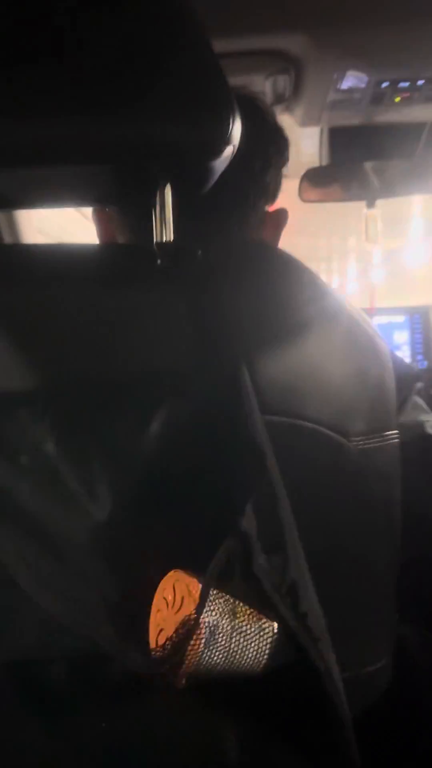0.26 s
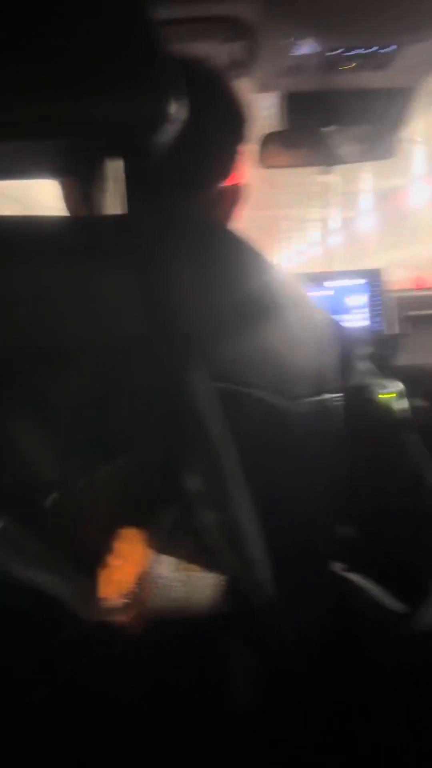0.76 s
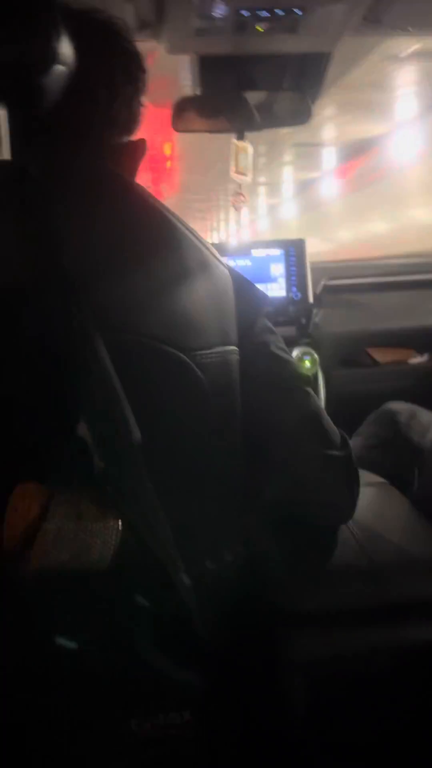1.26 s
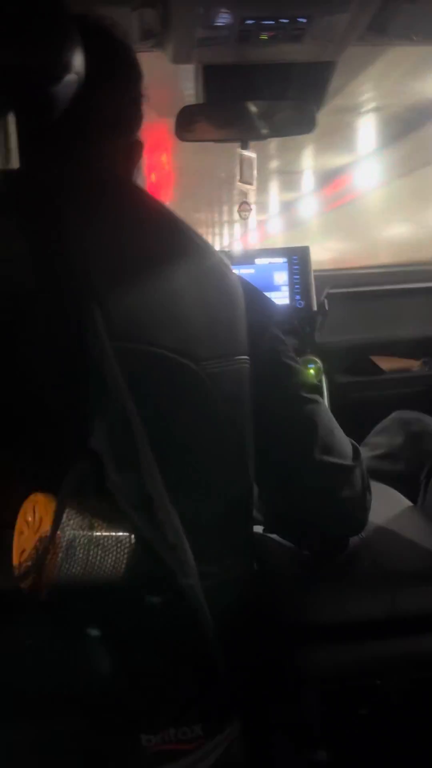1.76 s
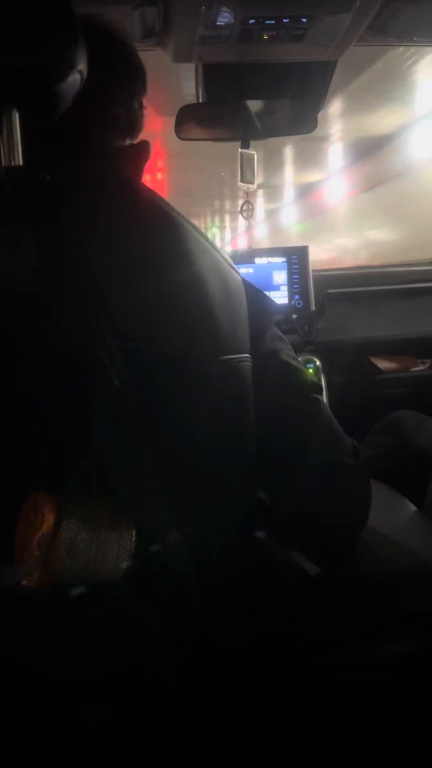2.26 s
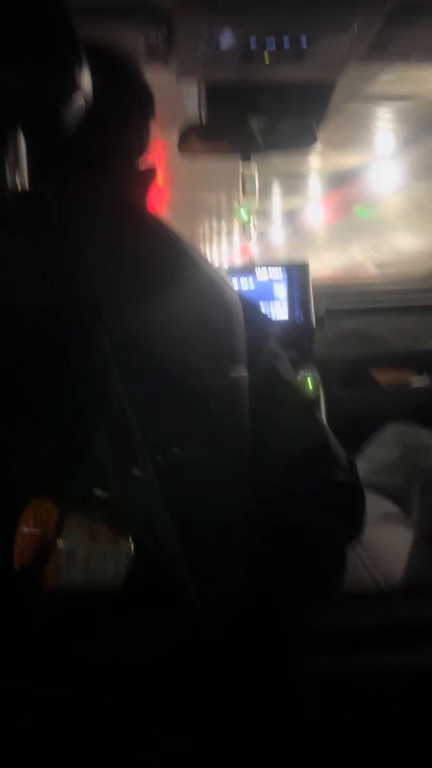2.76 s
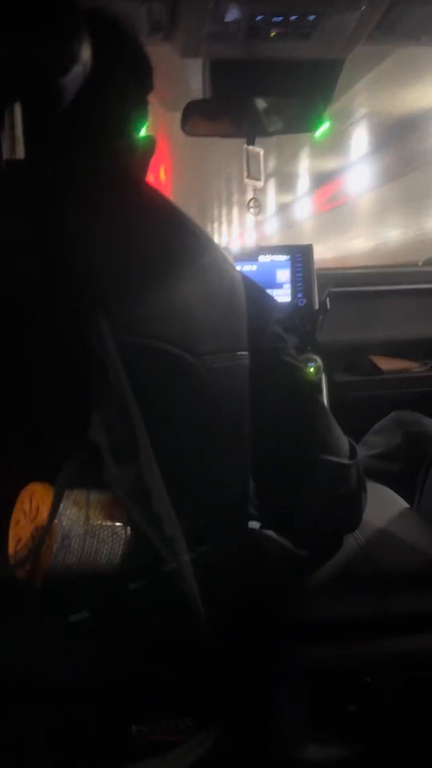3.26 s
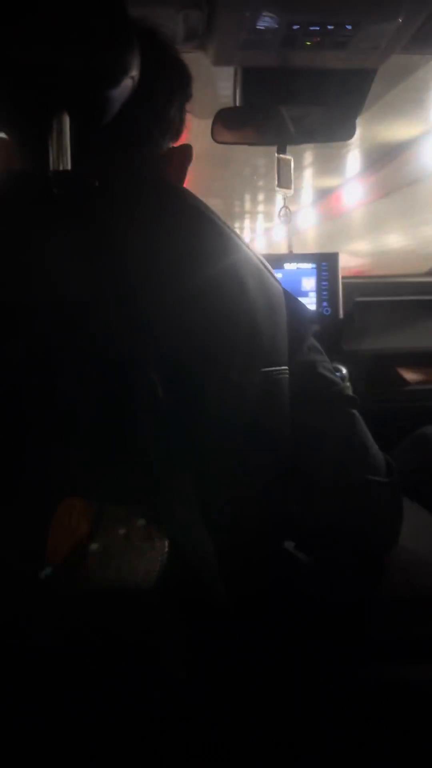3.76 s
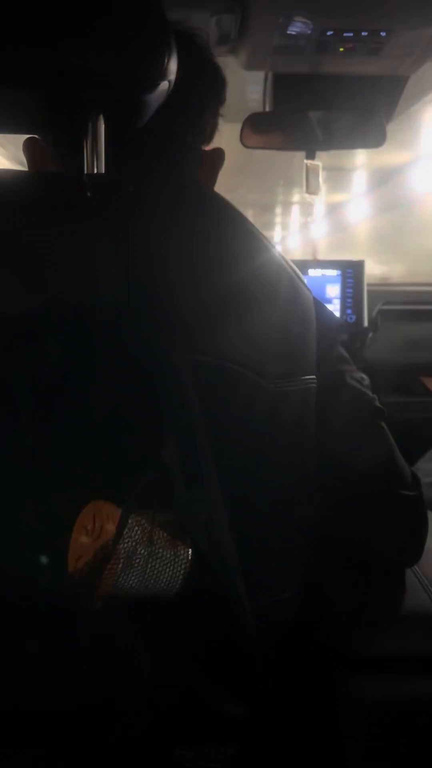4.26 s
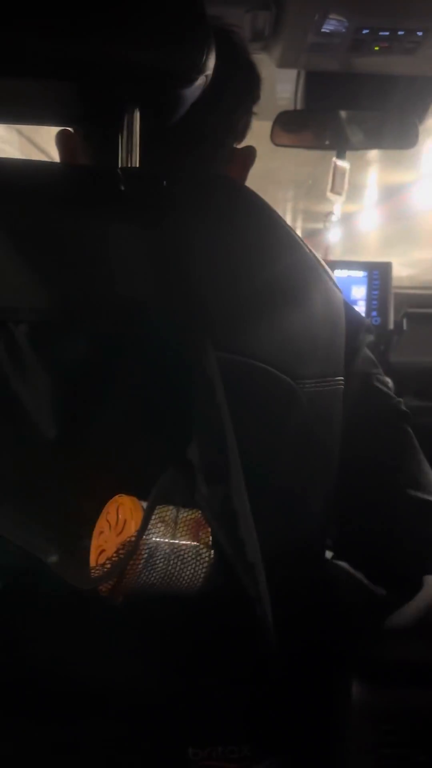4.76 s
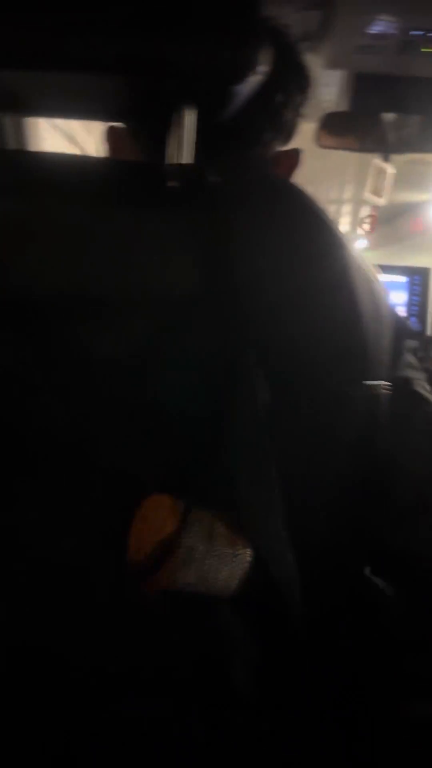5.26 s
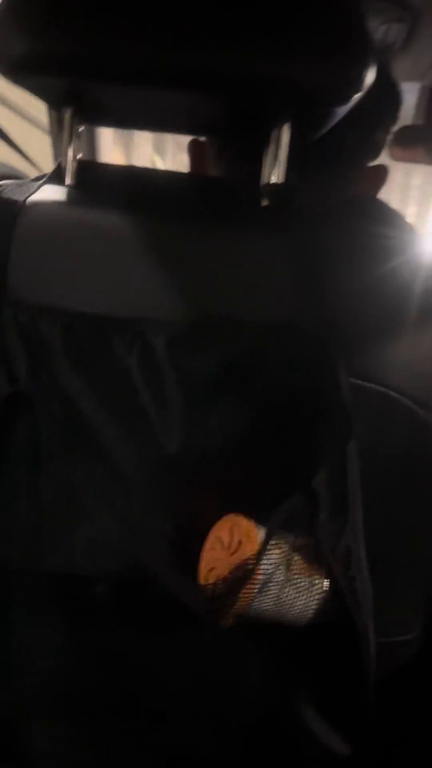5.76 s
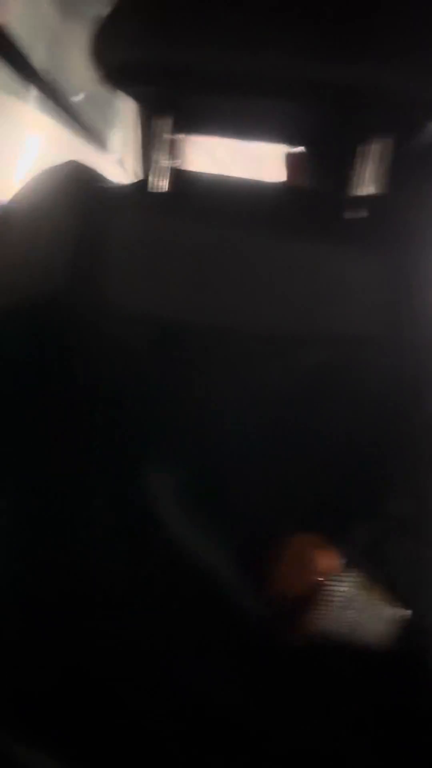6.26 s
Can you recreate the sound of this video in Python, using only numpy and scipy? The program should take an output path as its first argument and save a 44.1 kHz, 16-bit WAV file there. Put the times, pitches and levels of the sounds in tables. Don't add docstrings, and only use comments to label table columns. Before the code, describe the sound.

Continuous bass-heavy car interior sound, recorded by a handheld stereo device in the rear seat. Road bumps make the low boom pulse unevenly while tyre roar reflects dully off tunnel walls. Early on there is a neighbouring vehicle's low tone, then a light cloth rustle and a tiny plastic click. Low hums waver, a seal whistles almost inaudibly, and later the engine pushes harder, rising in pitch until the abrupt end.

```python
import sys
import numpy as np
from scipy import signal
from scipy.fft import rfft, irfft, next_fast_len
from scipy.io import wavfile

SR = 44100
rng = np.random.default_rng(int(sys.argv[2]) if len(sys.argv) > 2 else 0)


def decibels_to_gain(level_db):
    exponent = np.asarray(level_db, float) / 20
    return 10 ** exponent


def pcm_store(signal):
    levels = np.round(np.clip(np.atleast_2d(signal), -1, 1) * 32767)
    wavfile.write(sys.argv[1], SR, levels.astype(np.int16).T)


N = 287091
OPPOSITE = np.array([[1], [-1]])


def rms_one(x):
    return x / np.sqrt(np.mean(x ** 2) + 1e-20)


def in_time(rows):
    s, *columns = np.transpose(rows)
    return [np.interp(np.arange(N) / SR, s, c) for c in columns]


def per_sample(control):
    return np.interp(np.arange(N) / SR * 1000, np.arange(len(control)), control)


def coloured(spectrum):
    size = next_fast_len(N)
    hz, level = np.transpose(spectrum)
    log_hz = np.log(np.arange(size // 2 + 1) * SR / size + 1e-3)
    gain = decibels_to_gain(np.interp(log_hz, np.log(hz), level, left=-120, right=-120))
    white = rng.standard_normal(size)
    return rms_one(irfft(rfft(white) * gain, size)[:N])


def drift(rate):
    r = np.exp(-80 * np.pi * rate / SR)
    sparse = rng.standard_normal(N // 40 + 2002)
    slow = signal.lfilter([1], [1, -2 * r, r * r], sparse)[2000:]
    return np.interp(np.arange(N) / 40, np.arange(len(slow)), rms_one(slow))


def swell(start, hold, rise, fall):
    t = np.arange(0, N / SR, .001) - start
    ramp = np.minimum(t / rise + 1, (hold - t) / fall + 1)
    return np.sin(np.pi / 2 * np.clip(ramp, 0, 1)) ** 2


def swells(rows, rise, fall):
    gains = [decibels_to_gain(db) * swell(s, hold, rise, fall) for s, hold, db in rows]
    return per_sample(np.max(gains, axis=0))


def clicks(events):
    out = np.full(N, 1e-18)
    out[[round(s * SR) for s, db in events]] = decibels_to_gain(np.array(events)[:, 1])
    return out


def dying(impulses, t60):
    return signal.lfilter([1], [1, -decibels_to_gain(-60 / (t60 * SR))], impulses)


def hum(pitch, level, wobble_hz, multiple=1):
    hz = multiple * in_time(pitch)[0] + wobble_hz * drift(0.78)
    phase = 2 * np.pi * np.cumsum(hz) / SR + rng.uniform(0, 2 * np.pi)
    flutter_db = 1.2 * drift(5.1)
    load = swells(level, rise=0.076, fall=0.14)
    return np.sqrt(2) * decibels_to_gain(flutter_db) * load * np.sin(phase)


def road():
    # frequency in Hz, level in dB per Hz
    shake = [(16, -22), (25, -15), (32, -10), (38, -4), (48, 1.5), (58, -0.5), (68, -12.5), (90, -39.5)]
    # frequency in Hz, level in dB per Hz
    boom = [(45, -33), (60, -5.5), (78, 2), (95, -2), (112, -2.5), (124, -9), (134, -6), (148, -11),
            (165, -19.5), (200, -45.5)]
    # frequency in Hz, level in dB per Hz
    roar = [(110, -21), (150, 2), (165, -4), (183, 0.5), (200, -2.5), (310, -6), (400, -5), (490, -9),
            (560, -8), (640, -12), (950, -15), (1400, -22), (2300, -30.5), (3000, -42)]
    # frequency in Hz, level in dB per Hz
    hiss = [(1800, -25), (2600, 0.5), (3100, 1.5), (3500, 2.5), (4300, 0), (5200, 2.5), (5800, 0.5),
            (7200, -6), (8000, -14.5), (8500, -30), (9100, -30), (9600, -17), (10000, -39.5), (13500, -47),
            (14900, -35), (15500, -44)]
    # time in seconds, lift of shake in dB, lift of boom in dB
    surface = [(.06, -1, 5.5), (.17, -3, 1), (.33, 2, -11), (0.471, 10, -3), (.85, -2, -1.5),
               (.94, 3.5, -19), (1.298, 3, 1), (1.48, 9, 2), (1.56, -4, -9), (2.22, 1, 4.5), (2.55, 10, 3),
               (2.81, -3, -0.5), (2.9, 13, 0), (3.1, 1, 2), (3.36, 6, -10), (3.52, 10.5, -4),
               (3.68, -6, -3.5), (3.8, -3, 3), (3.95, 1, -4), (4.1, -1, 1), (4.22, -7, -5.5),
               (4.32, 12.5, -6), (4.671, 1, 11.5), (5.11, 0, -3.5), (5.22, 0, 3.5), (5.35, 8.5, 0),
               (5.5, -1, -5), (5.62, 6, 0.5), (5.76, -4, 2), (5.95, 3, 1), (6.08, -12, -2), (6.21, 4, 5),
               (6.431, -9, 4)]
    shake_db, boom_db, roar_db, hiss_db = -32, -25.5, -32, -57
    jolts = np.array([swell(s, 0, rise=0.024, fall=0.077) for s, *lifts in surface])
    shake_lift, boom_lift = [per_sample(lift) for lift in np.array(surface)[:, 1:].T @ jolts]
    pull_db = 0.18 * (np.arange(N) - N / 2) / SR
    body = decibels_to_gain(shake_db + shake_lift + pull_db) * coloured(shake)
    cabin = decibels_to_gain(boom_db + boom_lift + pull_db) * coloured(boom)
    walls = decibels_to_gain(roar_db + 0.36 * pull_db + 0.49 * drift(3.9)) * coloured(roar)
    seals = decibels_to_gain(hiss_db + 0.3 * pull_db + 0.56 * drift(6.4)) * coloured(hiss)
    return body + cabin + walls + seals


def port_lead(x):
    # frequency in Hz, quarter-cycle share (no unit, + = left leads)
    lead = [(500, 0), (1000, .13), (1500, .08), (2300, .03), (3000, .12), (3600, .03), (4600, .14),
            (5150, 0), (5600, -.15), (6500, -.46), (7300, -.7), (7900, -.83), (8600, -.5), (9500, 0)]
    size = next_fast_len(N)
    hz, share = np.transpose(lead)
    turn = 1j * np.interp(np.arange(size // 2 + 1) * SR / size, hz, share)
    return irfft(turn * rfft(x, size), size)[:N]


def diffuse():
    # frequency in Hz, level in dB per Hz
    scattered = [(30, -37), (60, -27.5), (100, -13.5), (160, -6.5), (310, -8.5), (380, -7), (500, -3),
                 (650, 0.5), (950, -2.5), (1400, -15.5), (1800, -29), (2200, -30), (2600, -23.5),
                 (3000, -24.5), (3500, -31), (4500, -31.5), (5200, -34), (5800, -37.5), (6500, -38),
                 (7300, -38), (8000, -43), (8800, -49.5)]
    # frequency in Hz, level in dB per Hz
    port_noise = [(7000, -8.5), (9000, 2.5), (11000, -1), (12500, -8), (14000, -11.5), (15000, -2),
                  (15500, -19)]
    # frequency in Hz, level in dB per Hz
    sway = [(25, -15.5), (50, -10), (90, -2.5), (130, -1.5), (170, -14)]
    steady = decibels_to_gain(-42.5) * coloured(scattered) + decibels_to_gain(-85.5) * coloured(port_noise)
    return steady + decibels_to_gain(-62.5 + 4 * drift(3)) * coloured(sway)


def footwell():
    # frequency in Hz, level in dB per Hz
    mode = [(200, -29.5), (260, -6), (315, 5), (350, -15), (420, -36)]
    # time in seconds, level in dB
    drive = [(0, -5), (1.2, -2), (2.2, 3), (3.4, 3), (4.2, 2.5), (5.2, 2), (6.51, 0)]
    drive_db = -45.5 + 0.3 * drift(.8) + in_time(drive)[0]
    return decibels_to_gain(drive_db) * coloured(mode) * decibels_to_gain(np.array([[-4], [3]]))


def tyre_hum():
    # start in seconds, hold in seconds, level in dB
    tread = [(0.0, 1.2, -34.5), (1.36, 0.12, -27), (1.6, 0.02, -31), (1.8, 0.53, -27), (2.42, 0.013, -27),
             (2.58, .02, -29), (2.7, 0.024, -25), (3.0, 0.046, -25.5), (3.2, 0.085, -25.5),
             (3.6, 0.71, -36), (4.68, 0.046, -31), (5.3, 0.42, -30.5), (5.95, 0.11, -26),
             (6.2, 0.27, -26.5)]
    # time in seconds, frequency in Hz
    pitch = [(0, 110), (2.8, 109.5), (3.2, 115), (3.7, 121), (5.2, 118.5), (6.51, 116)]
    return hum(pitch, tread, 0.27)


def neighbour():
    # start in seconds, hold in seconds, level in dB
    fading = [
        (0.0, 0.029, -27),
        (.2, 0.069, -31.5),
        (.46, 0.033, -24.5),
        (3.35, 0.23, -32.5),
        (4.02, 0.17, -34.5),
    ]
    # time in seconds, frequency in Hz
    pitch = [(0, 96), (.6, 96), (3.2, 126), (3.65, 137), (3.9, 96), (4.2, 102)]
    return hum(pitch, fading, 0.12)


def driveline():
    # start in seconds, hold in seconds, level in dB
    shaft = [
        (0.15, 0.18, -30),
        (.6, 0.39, -30.5),
        (1.1, 1.32, -30.5),
        (3.0, 0.24, -28),
    ]
    # time in seconds, frequency in Hz
    shaft_hz = [(0, 44), (3.3, 44.5)]
    # start in seconds, hold in seconds, level in dB
    axle = [(1.2, 0.55, -35), (2.42, 0.06, -34), (2.65, 0.19, -28.5), (3.12, 0.084, -25.5),
            (3.502, 1.1, -33), (5.22, 0.23, -27.5), (5.55, 0.2, -29), (5.9, 0.09, -22.5),
            (6.15, 0.1, -25.5), (6.4, .08, -26)]
    # time in seconds, frequency in Hz
    axle_hz = [(0, 51), (6.51, 50)]
    return hum(shaft_hz, shaft, 0.18) + hum(axle_hz, axle, 0.14)


def floor_panel():
    # start in seconds, hold in seconds, level in dB
    panel = [
        (0.448, 0.24, -29),
        (1.5, .04, -27.5),
        (5.78, 0.14, -27),
        (6.015, 0.076, -25),
    ]
    # time in seconds, frequency in Hz
    pitch = [(0, 60), (.8, 60), (1.4, 72), (1.6, 72), (5.7, 79), (6.1, 84)]
    return hum(pitch, panel, 0.26)


def sleeve():
    # start in seconds, hold in seconds, level in dB
    strokes = [
        (.818, .003, -64),
        (.86, 0.008, -65.5),
        (.92, 0.0085, -63),
        (.95, .025, -56),
        (.99, 0.031, -56),
        (1.038, 0.019, -55),
        (1.156, 0.0033, -65.5),
        (1.2, 0.011, -61.5),
    ]
    # frequency in Hz, level in dB per Hz
    cloth = [(2500, -7), (4300, -2.5), (5400, 1.5), (7500, -3.5), (9000, -14.5), (10000, -18), (11000, -36),
             (14000, -38.5), (15000, -22), (15600, -34)]
    # frequency in Hz, level in dB per Hz
    brush = [(3000, -17), (5000, -2.5), (7500, -0.5), (10500, -7), (12500, -15), (15000, -15.5),
             (15600, -27)]
    # time in seconds, peak level in dB
    catches = [(.6035, -57), (.8177, -63), (.8362, -49), (.9125, -63), (.9415, -49), (1.0402, -64),
               (1.156, -68), (3.3, -68), (5.1, -64)]
    grain = decibels_to_gain(1.5 * drift(90))
    stroke = grain * swells(strokes, rise=.025, fall=0.054)
    fibres = coloured(cloth) + decibels_to_gain(-7.0) * coloured(brush) * OPPOSITE
    band = signal.butter(2, [7500, 15000], "band", fs=SR, output="sos")
    bright = signal.sosfilt(band, rng.standard_normal(N))
    snags = dying(clicks(catches), .005) * bright
    return stroke * fibres + snags * [[1], [.25]]


def engine():
    # start in seconds, hold in seconds, level in dB
    cruising = [(0.641, 0.049, -19), (1.03, 0.2, -25.5), (1.45, 0.043, -22), (1.7, 0.026, -31),
                (1.9, 0.13, -26.5), (2.13, 0.14, -25.5), (2.42, 0.014, -27), (2.53, 0.035, -27.5),
                (2.78, 0.032, -35), (2.9, 0.058, -25.5)]
    # time in seconds, frequency in Hz
    cruising_hz = [(.55, 87), (.8, 86), (1.0, 78.5), (2.2, 78.5), (3.1, 82.5)]
    # start in seconds, hold in seconds, level in dB
    revving = [(3.637, 0.3, -21.5), (4.115, 0.042, -25), (4.28, 0.066, -24.5), (4.537, 0.044, -23.5),
               (4.664, 0.074, -22.5), (4.84, 0.12, -21.5), (5.066, 0.026, -28.5), (5.225, 0.083, -22.5),
               (5.474, 0.12, -20), (6.002, 0.073, -27.5), (6.376, 0.058, -20.5)]
    # time in seconds, frequency in Hz
    revving_hz = [(3.5, 71), (3.74, 72), (4.3, 72), (4.45, 74), (4.7, 80), (4.97, 88), (5.08, 84),
                  (5.15, 76), (5.2, 98), (5.33, 96), (5.5, 100), (5.7, 100), (5.9, 96), (6.2, 95),
                  (6.51, 98)]
    # start in seconds, hold in seconds, level in dB
    half_order = [
        (3.45, 0.3, -35),
        (3.9, .45, -34.5),
        (4.6, .3, -39),
    ]
    # start in seconds, hold in seconds, level in dB
    second_order = [
        (4.36, 0.23, -36.5),
        (5.8, 0.1, -42),
    ]
    firing = hum(cruising_hz, cruising, 0.33) + hum(revving_hz, revving, 0.29)
    half = hum(revving_hz, half_order, 0.35, multiple=1 / 2)
    return firing + half + hum(revving_hz, second_order, 0.29, multiple=2)


def vent():
    # start in seconds, hold in seconds, level in dB
    whistles = [
        (2.95, .3, -68),
        (1.65, .2, -68),
        (5.8, .3, -71),
    ]
    # frequency in Hz, level in dB per Hz
    band = [(3100, -35.5), (3350, -2.5), (3500, 5), (3650, -11.5), (3900, -31)]
    return swells(whistles, rise=0.3, fall=0.3) * coloured(band)


def trim():
    # time in seconds, peak level in dB
    ticks = [
        (1.8459, -43),
        (1.8492, -42),
        (1.8525, -47),
        (1.8563, -53),
        (1.8628, -54),
    ]
    # frequency in Hz, level in dB, 60 dB decay time in seconds
    modes = [(900, 0, .015), (1310, 5, .022), (1440, 6, .022), (1750, 1, .015), (2200, 3, .02),
             (2630, 3, .02), (2850, -2, .016), (4670, 2, .024), (5150, -5, .014), (5600, -9, .01),
             (6200, -13, .01)]
    # frequency in Hz, level in dB per Hz
    crack = [(500, -3), (1200, 5), (2900, -12), (3300, -9), (4200, -10), (4700, 5), (6500, -12),
             (8000, -20), (10500, -32)]
    hits, rings = clicks(ticks), np.zeros(N)
    for hz, db, t60 in modes:
        r, w = decibels_to_gain(-60 / (t60 * SR)), 2 * np.pi * hz / SR
        rings += signal.lfilter([0, decibels_to_gain(db) * np.sin(w)], [1, -2 * r * np.cos(w), r * r], hits)
    burst = decibels_to_gain(-1.0) * dying(hits, 0.022)
    noise = coloured(crack) + decibels_to_gain(-3) * coloured(crack) * OPPOSITE
    soft_top = signal.butter(6, 7500, fs=SR, output="sos")
    return signal.sosfilt(soft_top, rings + burst * noise)


def door_hum():
    # start in seconds, hold in seconds, level in dB
    door = [
        (2.05, 0.4, -56.5),
        (3.053, .2, -64),
        (4.75, 0.4, -58),
        (5.35, 0.63, -58),
        (5.9, .6, -50),
    ]
    # time in seconds, frequency in Hz
    pitch = [(2, 107), (3.3, 108), (4.7, 94), (5.2, 99), (6.51, 99)]
    return hum(pitch, door, 0.3)


def scene():
    tunnel = road()
    hums = tyre_hum() + neighbour() + driveline() + floor_panel() + engine()
    across = diffuse() + door_hum() + port_lead(tunnel)
    return tunnel + hums + footwell() + sleeve() + vent() + trim() + across * OPPOSITE


def band_limit(x):
    return signal.sosfilt(signal.butter(12, 15300, fs=SR, output="sos"), x)


def record(dry):
    ceiling = 0.62
    rounded = ceiling * np.tanh(dry / ceiling)
    ramp = np.minimum(np.arange(N) + 55, N - np.arange(N)) / 110
    edge = np.sin(np.pi / 2 * np.clip(ramp, 0, 1)) ** 2
    return band_limit(rounded * edge)


dry = scene()
out = record(dry)
pcm_store(out)
```